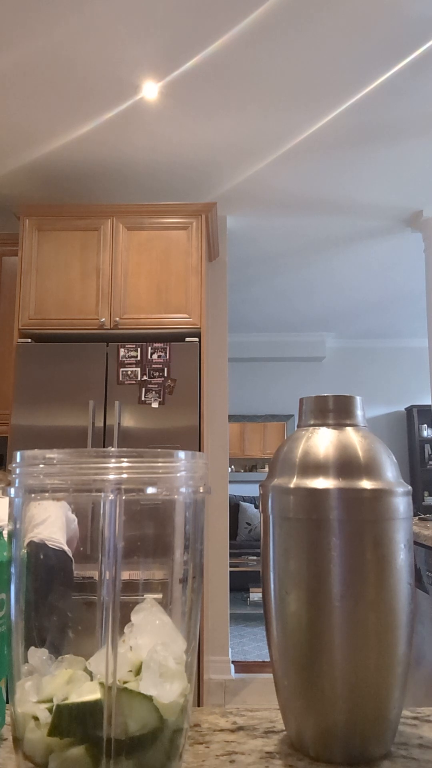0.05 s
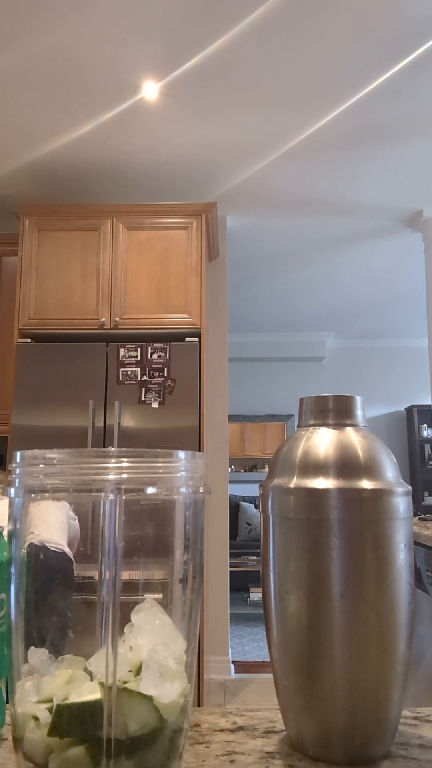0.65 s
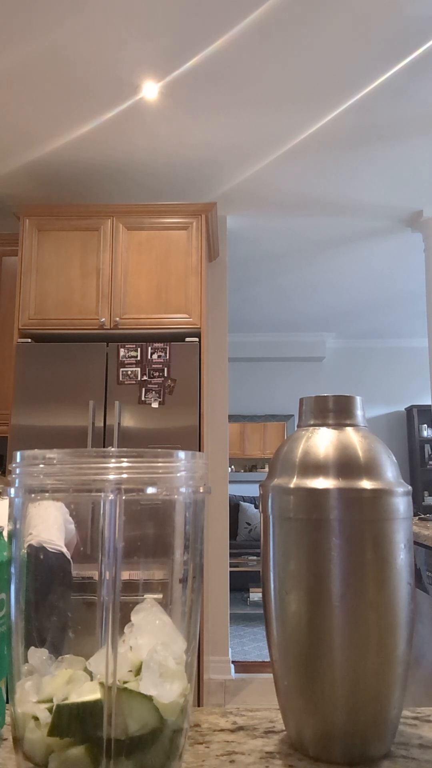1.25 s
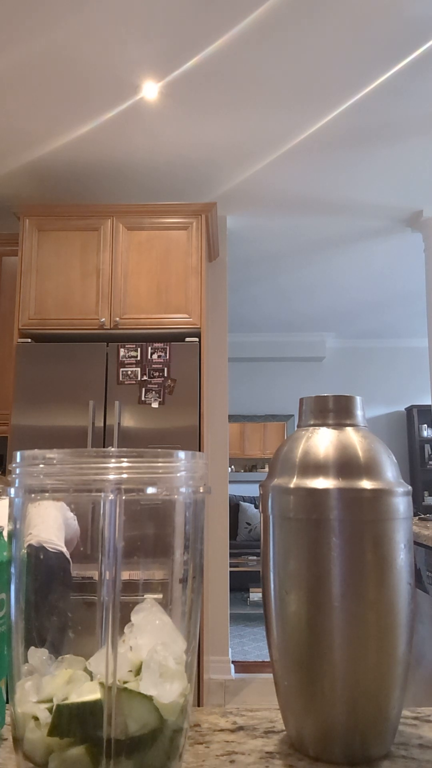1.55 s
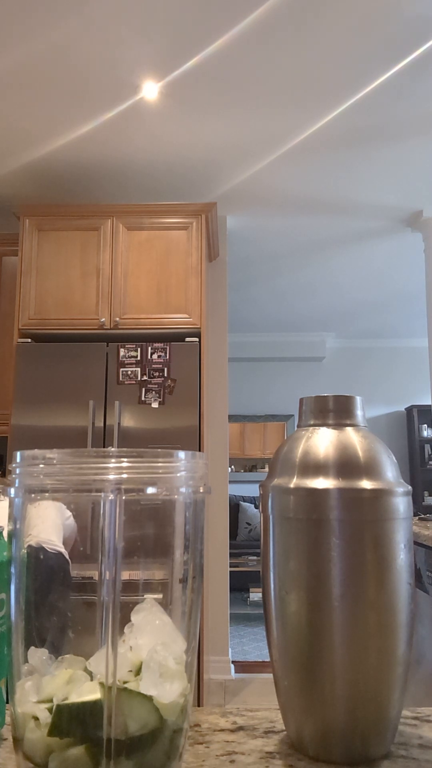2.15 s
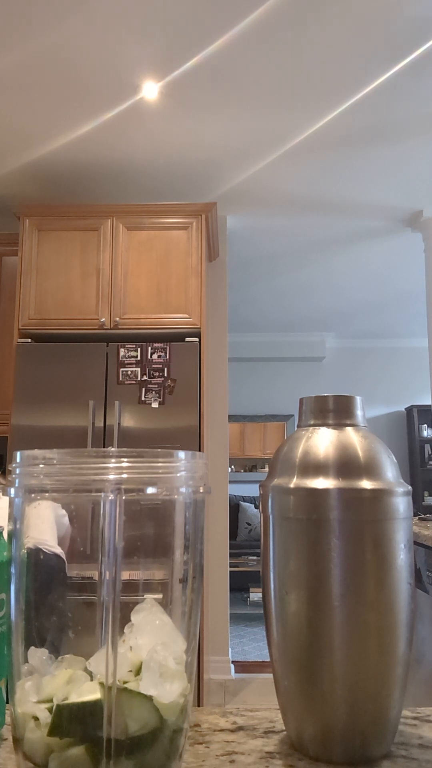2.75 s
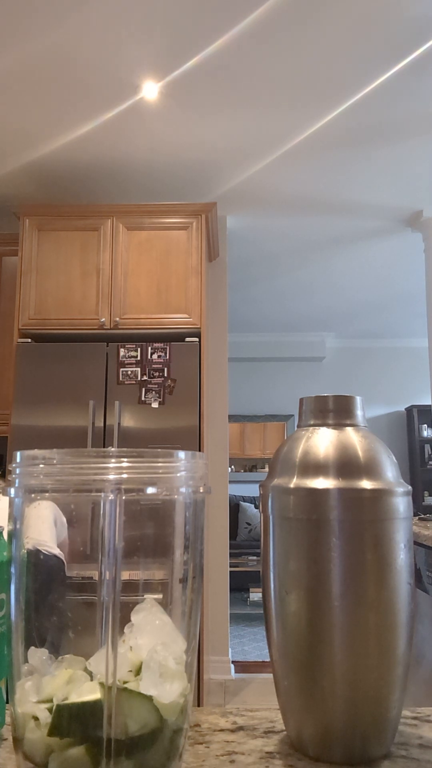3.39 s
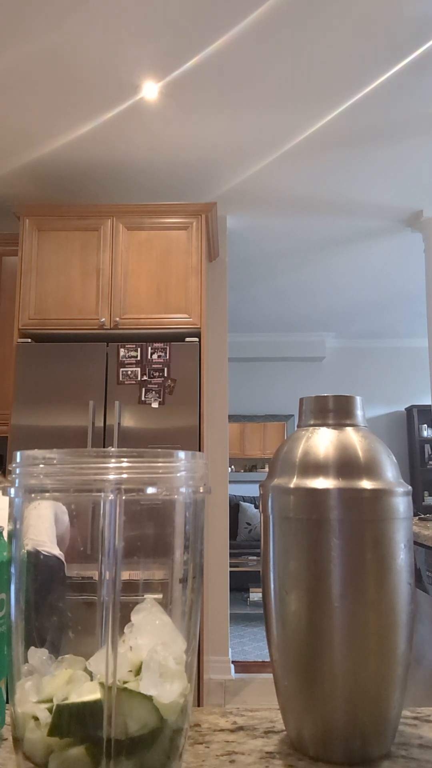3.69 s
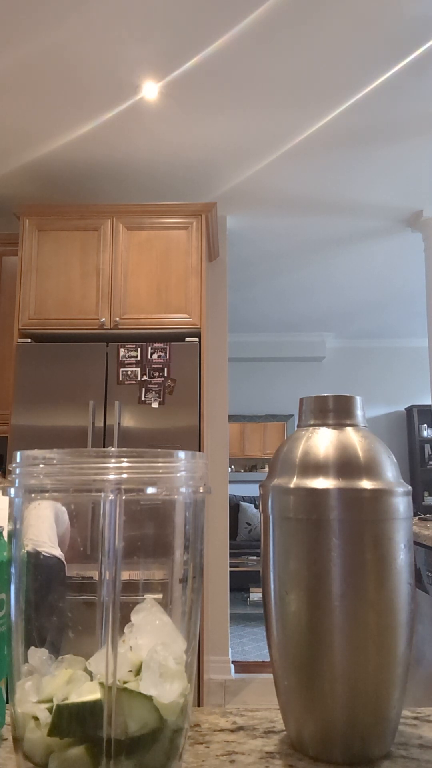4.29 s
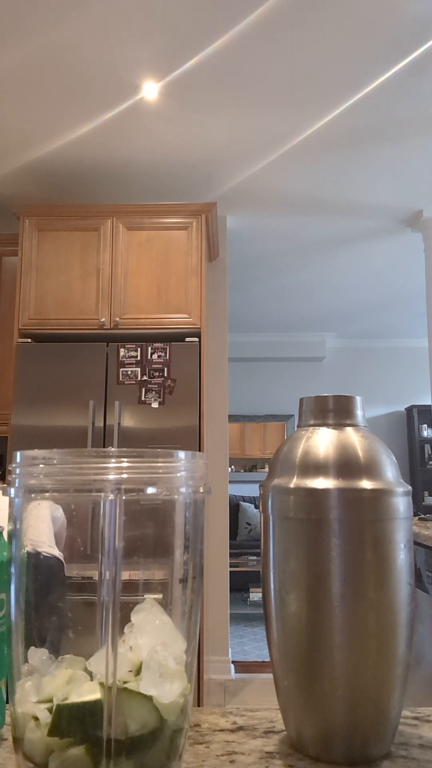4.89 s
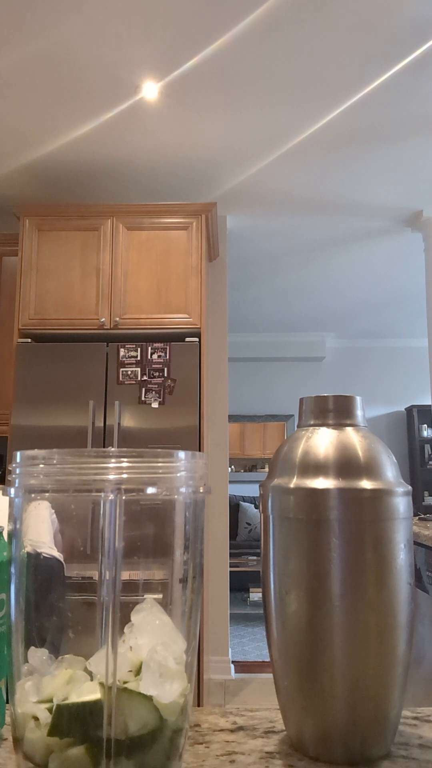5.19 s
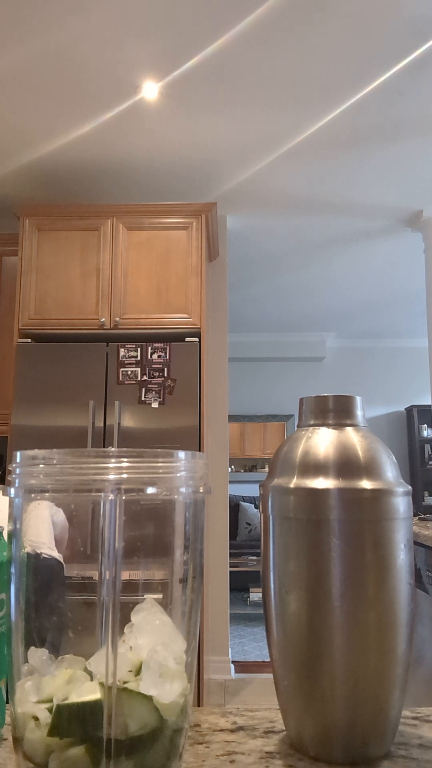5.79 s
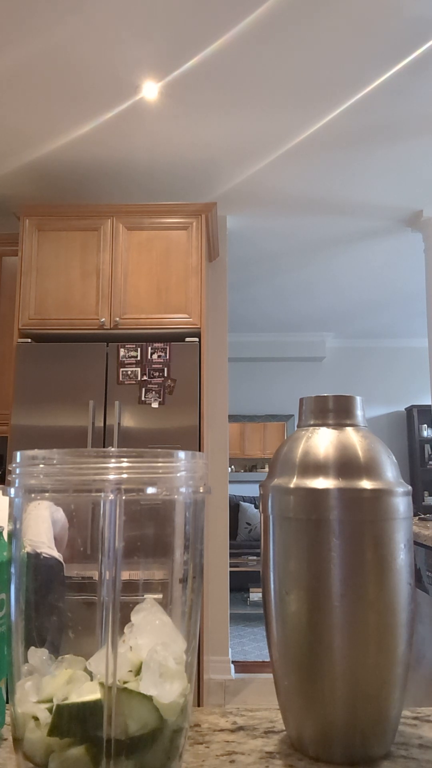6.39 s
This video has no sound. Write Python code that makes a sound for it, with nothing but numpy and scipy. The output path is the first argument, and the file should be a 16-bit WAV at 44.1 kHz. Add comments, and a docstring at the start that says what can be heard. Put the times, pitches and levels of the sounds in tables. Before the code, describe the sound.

Ice cubes are scooped from a plastic freezer bin a few metres away in a home kitchen. They clack and clink in quick, uneven clusters, with small chips ticking in between. One hard plastic knock comes early, then the digging grows louder and heavier shoves make the hollow bin boom. The microphone picks up plenty of room echo and a faint, steady fridge hum.

```python
"""Scooping ice from a freezer bin

Ice cubes are scooped out of a plastic bin, a few metres away across a kitchen. Each collision is a quick
chatter of contacts on ice and bin wall, with a short, high ring. Heavier shoves boom in the hollow bin,
and small chips shift in between. Most of this arrives as room echo, over the hum of the fridge."""
import sys
import numpy as np
from scipy import signal
from scipy.fft import rfft, irfft, next_fast_len
from scipy.io import wavfile

SR = 44100
rng = np.random.default_rng(int(sys.argv[2]) if len(sys.argv) > 2 else 0)


def master_out(mix):
    """Clip the mix to full scale and print it as 16-bit PCM to the path in sys.argv[1]."""
    frames = np.transpose(np.atleast_2d(mix))
    ceiling = np.clip(frames, -1, 1)
    pcm = np.round(ceiling * 32767).astype(np.int16)
    wavfile.write(sys.argv[1], SR, pcm)


N = 284445
TIME = np.arange(N) / SR
HIT_SIZE = 4096  # samples in one hit
HIT_HZ = np.arange(HIT_SIZE // 2 + 1) * SR / HIT_SIZE
SPOTS = 5  # places in the heap of ice, each with its own echoes

# The main collisions. Each row: start in seconds, strength in dB, hardness in dB
# (above 0 ice cracks on ice, below 0 it lands on plastic).
CLACKS = [(0.027, -37.5, -5.5), (0.103, -41, 8), (0.11, -35, 8), (0.218, -35.5, -1), (0.379, -56, 8.5),
          (0.453, -49.5, 12.5), (0.512, -38.5, 3), (0.53, -36.5, -6), (0.578, -45.5, 8), (0.615, -36.5, 5),
          (0.843, -45.5, 5.5), (0.896, -38, 5), (0.903, -33, 5.5), (0.926, -33, 11), (1.019, -39, 4),
          (1.22, -43.5, 1), (1.258, -35, 6), (1.297, -32.5, 5), (1.418, -45.5, 16.5), (1.43, -36.5, -5.5),
          (1.502, -31.5, -4), (1.669, -40, -4), (1.817, -44, 7.5), (1.84, -42.5, 5), (1.932, -48, -8),
          (2.154, -38.5, 1), (2.18, -43, -1), (2.305, -47, 6), (2.332, -45.5, 4), (2.376, -43.5, 2),
          (2.411, -43, 3), (2.462, -37, 1), (2.785, -39, 2.5), (2.811, -37, -0.5), (2.831, -40.5, 9),
          (3.052, -33.5, 1), (3.369, -42, -7), (3.461, -43.5, -5), (3.581, -35, 0), (3.624, -35.5, 5.5),
          (3.654, -29, 4.5), (3.683, -28.5, 8), (4.065, -38.5, -2), (4.086, -28.5, 2.5),
          (4.098, -28.5, 2.5), (4.142, -33.5, 5), (4.176, -37.5, 2), (4.194, -31, 6.5), (4.206, -34.5, -1),
          (4.295, -45.5, -23), (4.448, -54, 4.5), (4.589, -40.5, 1), (4.635, -42.5, 7.5),
          (4.678, -42, 10.5), (4.709, -35.5, 5), (4.733, -28.5, -1), (4.753, -30.5, 1), (4.954, -39.5, -4),
          (5.115, -43, -6), (5.295, -45.5, 4.5), (5.34, -38.5, -3), (5.357, -37, -9), (5.592, -41, 1),
          (5.613, -34.5, 2), (5.716, -24.5, 2), (5.742, -28.5, -1), (5.762, -32.5, -5), (5.832, -39.5, 3),
          (5.997, -41.5, -10), (6.092, -39, 3), (6.11, -34.5, 1), (6.196, -39, 9), (6.221, -29, 0.5),
          (6.294, -36.5, -1)]
# The notes the bin wall rings at. Each row: pitch in Hz, width in Hz, level in dB.
WALL_NOTES = [(528, 264, 10), (824, 320, -5), (1106, 116, 3.5), (1570, 130, -0.5), (1754, 64, -3.5)]
# The tone of whole cubes, of their corners and of breaking frost. Each row: frequency in Hz, level in dB.
CUBE_TONE = [(1000, -39), (1800, 10.5), (2400, 7), (3300, 4.5), (4200, -27.5), (6000, -36)]
CORNER_TONE = [(2200, -50), (3500, -3.5), (4400, 3.5), (5100, 5), (6500, 1.5), (7600, -7.5), (11000, -41)]
FROST_TONE = [(3500, -73.5), (6000, 7.5), (7200, 5.5), (8400, 5), (10000, 3), (12000, -3), (16000, -0.5)]


def gain(db):
    """Turn decibels into a number to multiply by."""
    return 10 ** (np.asarray(db) / 20)


def unit(x):
    """Scale a sound to an energy of one."""
    return x / np.sqrt(np.sum(x ** 2) + 1e-18)


def look_up(points, hz, column=1):
    """Read between the rows of a frequency table, giving each octave equal room."""
    points = np.array(points, float)
    return np.interp(np.log(np.maximum(hz, 1)), np.log(points[:, 0]), points[:, column])


def tone_filter(points, column=1):
    """Turn rows of Hz and dB into a filter that rings only after it is struck."""
    cepstrum = irfft(np.log(gain(look_up(points, HIT_HZ, column))))
    cepstrum[1:HIT_SIZE // 2] *= 2
    cepstrum[HIT_SIZE // 2 + 1:] = 0
    return np.exp(rfft(cepstrum))


def resonance(hz, width_hz):
    """The spectrum of one ringing note: the wider it is, the sooner it dies away."""
    return 1j * HIT_HZ * width_hz / (hz ** 2 - HIT_HZ ** 2 + 1j * HIT_HZ * width_hz)


def add_hit(track, start_s, spectrum, db):
    """Mix in one hit with as much energy as 20 ms of steady sound at this level."""
    hit = unit(irfft(spectrum)) * gain(db) * np.sqrt(.02 * SR)
    start = max(int(start_s * SR), 0)
    part = hit[:, :max(N - start, 0)]
    track[:, start:start + part.shape[1]] += part


def chatter(gap_s, rebound, count):
    """A first contact and its fading, uneven rebounds, spread over the heap: one spectrum per spot."""
    delays = np.r_[0, np.cumsum(rng.exponential(gap_s, count))]
    sizes = np.r_[1, rebound * rng.choice([-1, 1], count) * np.linspace(1, .3, count)]
    contacts = np.zeros((SPOTS, HIT_SIZE))
    spots = (rng.integers(SPOTS) + np.arange(count + 1)) % SPOTS
    contacts[spots, (delays * SR).astype(int) % HIT_SIZE] = sizes
    return rfft(contacts)


def patter(per_s, spread_db, body, curve):
    """Tiny random contacts ring a body; their level follows rows of seconds and dB."""
    count = int(per_s * N / SR)
    chance, ticks = rng.standard_normal(count), np.zeros((SPOTS, N))
    sizes = np.sign(chance) * gain(spread_db * np.minimum(abs(chance), 2))
    ticks[rng.integers(SPOTS, size=count), rng.integers(N, size=count)] = sizes
    sound = signal.oaconvolve(ticks, irfft(body)[None], axes=1)[:, :N]
    return unit(sound) * np.sqrt(N) * gain(np.interp(TIME, *np.transpose(curve)))


def surrounding_noise(size, apart_hz=520):
    """The spectrum of stereo noise from all round: long waves reach both microphones alike."""
    hz = np.arange(size // 2 + 1) * SR / size
    mid, side = rfft(rng.standard_normal((2, size)))
    share = np.minimum(hz / apart_hz, 1) ** 17
    return hz, (mid + np.array([[1], [-1]]) * share * side) / np.sqrt(1 + share ** 2)


def fridge_hum(waver_db=5.5):
    """The compressor hums on a few low notes, each wavering by itself."""
    # The notes of the hum. Each row: pitch in Hz, usual level in dB.
    notes = [(59.3, -54.5), (92.8, -61), (118.6, -67.5), (199, -83)]
    # The slow swell of the whole hum. Each row: time in seconds, change in dB.
    swell = [(0, 0.5), (.5, -3.5), (1.4, 2.5), (2.6, -0.5), (3.3, -4.5), (4.4, -2), (5.3, 1.5), (6.0, 3),
             (6.45, 2)]
    turns_s = np.linspace(0, N / SR, 40)
    hum = 0
    for hz, db in notes:
        waver = np.interp(TIME, turns_s, rng.standard_normal(len(turns_s)))
        phase = 2 * np.pi * (hz * TIME + rng.random()) + 0.065 * waver
        hum += np.sqrt(2) * gain(db + waver_db * waver) * np.sin(phase)
    return hum * gain(np.interp(TIME, *np.transpose(swell)))


def room_air(level_db=-55.5):
    """Soft, dark room noise."""
    # The tone of the quiet kitchen. Each row: frequency in Hz, relative level in dB.
    air_tone = [(20, 1), (45, 11.5), (60, 7), (80, 12), (130, 12), (220, 10.5), (400, -13), (1000, -32),
                (3000, -12), (8000, -28), (16000, -37)]
    hz, noise = surrounding_noise(2 * next_fast_len(N // 2 + 1))
    air = irfft(noise * gain(look_up(air_tone, hz)))[:, :N]
    return unit(air) * np.sqrt(2 * N) * gain(level_db)


def collisions(tumbles_per_s=32, fade_db_per_s=-22.5, spread_db=6):
    """List the main collisions, then those of loose cubes tumbling ahead of the scoop."""
    # Runs of tumbling cubes. Each row: start in seconds, length in seconds, strength in dB, hardness in dB.
    tumbles = [(3.472, 0.1, -49.5, 4.5), (3.769, .22, -44.5, -8), (4.919, .12, -41, -0.5),
               (5.16, .11, -49, -1.5), (5.41, .16, -48, 1)]
    rows = list(CLACKS)
    for start, length, db, hardness in tumbles:
        count = max(round(length * tumbles_per_s), 1)
        for delay in length * (np.arange(count) + rng.random(count)) / count:
            strength_db = db + fade_db_per_s * delay + spread_db * rng.standard_normal()
            rows.append((start + delay, strength_db, hardness))
    return rows


def stray_notes(low_hz, high_hz, count, width_hz):
    """No two corners or splinters have the same shape, so their extra notes fall at random."""
    return sum(resonance(hz, width_hz) for hz in rng.uniform(low_hz, high_hz, count))


def wall_knock(spread_db=4.4):
    """The spectrum of one knock on the wall: each note varies with the place struck and the load of ice."""
    wall = 0
    for hz, width, db in WALL_NOTES:
        strength = gain(db + spread_db * rng.standard_normal())
        wall += strength * resonance(hz * rng.uniform(0.873, 1.03), width)
    return wall * resonance(1090, 2400)


def ice_clacks(unshifted_hz=2173, usual_corner_hz=4923, pitch_spread=0.025):
    """Each collision knocks the wall, clacks with a short ring, clicks a corner and breaks some frost."""
    # A ring near 2.5 kHz on each clack, slightly lower and more damped in the second half.
    # Each row: time in seconds, pitch in Hz, how freely it rings (more is freer).
    clack_ring = [(0, 2495, 0.84), (1.3, 2480, 1.26), (3.102, 2520, 0.55), (3.5, 2400, 0.17),
                  (4.7, 2325, 0.59), (5.4, 2280, 0.19), (6.45, 2344, 0.85)]
    times, pitches, freedoms = np.transpose(clack_ring)
    corner_filter, frost_filter = tone_filter(CORNER_TONE), tone_filter(FROST_TONE)
    out = np.zeros((SPOTS, N))
    for start, db, hardness in collisions():
        ring_hz = np.interp(start, times, pitches) * np.exp(pitch_spread * rng.standard_normal())
        corner_hz = usual_corner_hz * np.exp(pitch_spread * rng.standard_normal())
        freedom = np.interp(start, times, freedoms)
        contact = chatter(gap_s=.0016, rebound=1, count=6)
        tone_shift = (ring_hz / unshifted_hz) ** 0.27  # the clack's whole tone rises a little with its ring
        clack = tone_filter([(hz * tone_shift, level) for hz, level in CUBE_TONE])
        clack *= 1 + 2.3 * freedom * resonance(ring_hz, 70)
        free_ring_db = freedom - 1  # a clack that rings freely is slightly louder
        strays = stray_notes(3000, 7000, count=3, width_hz=130)
        corner = corner_filter * (1 + 1.5 * resonance(corner_hz, 100) + 0.99 * strays)
        frost = frost_filter * (1 + 1.1 * stray_notes(7000, 15000, count=5, width_hz=160))
        # soft contacts favour the wall, hard ones the corners and frost
        add_hit(out, start, contact * wall_knock(), db - 0.33 * hardness)
        add_hit(out, start, contact * clack, db - 0.16 - 0.14 * hardness + free_ring_db)
        add_hit(out, start, contact * corner, db - 4.25 + 0.43 * hardness)
        add_hit(out, start, contact * frost, db - 6.5 + 0.97 * hardness)
    return out


def ice_chips(quieter_db=12.5, settle_s=0.04):
    """Each main collision loosens small chips that tick as they come to rest."""
    t = np.linspace(0, N / SR, 600)
    power = sum(gain(db - quieter_db) ** 2 * (t > start) * np.exp(-abs(t - start) / settle_s)
                for start, db, _ in CLACKS)
    settling = np.c_[t, 10 * np.log10(power + 1e-12)]
    ice = tone_filter(CUBE_TONE) + 1.63 * tone_filter(CORNER_TONE) + 0.72 * tone_filter(FROST_TONE)
    wall = sum(gain(db) * resonance(hz, width) for hz, width, db in WALL_NOTES)
    body = (ice + 1.24 * wall) * resonance(2600, 12000)
    return patter(per_s=110, spread_db=8, body=body, curve=settling)


def bin_booms(hollow_hz=217, usual_floor_hz=420.4, pitch_spread=0.042, nudge_db=-48.5):
    """The heap thumps the bin, which hums briefly at two notes: one from its hollow, one from its floor."""
    # Heavy shoves. Each row: start in seconds, strength in dB, pitch of the loaded bin floor in Hz.
    shoves = [(0.032, -46, 556), (0.226, -36.5, 500), (0.52, -55, 527), (0.645, -38, 400),
              (0.707, -38, 438), (0.922, -37, 433), (1.02, -43.5, 517), (1.505, -31, 568), (1.69, -40, 423),
              (1.931, -35, 406), (2.018, -63, 405), (2.163, -51, 408), (2.405, -52, 336), (2.646, -54, 416),
              (2.8, -49.5, 420), (2.831, -36, 408), (3.054, -55, 430), (3.667, -39, 404), (3.381, -47, 515),
              (4.088, -29.5, 436), (4.108, -23, 425), (4.295, -27, 422), (4.635, -40, 430),
              (4.751, -27, 394), (4.94, -42, 496), (5.42, -34.5, 417), (5.498, -39, 400),
              (5.616, -35.5, 410), (5.67, -35.5, 411), (5.72, -37.5, 403), (5.764, -38, 503),
              (6.002, -47.5, 544), (6.221, -37, 563)]
    average_shove_db = np.mean([db for _, db, _ in shoves])
    average_clack_db = np.mean([db for _, db, _ in CLACKS])
    thumps = list(shoves)
    for start, db, _ in CLACKS:  # each main collision also nudges the bin
        floor_hz = usual_floor_hz * np.exp(pitch_spread * rng.standard_normal())
        thumps.append((start, nudge_db + db - average_clack_db, floor_hz))
    out = np.zeros((SPOTS, N))
    for start, db, floor_hz in thumps:
        # a lighter load raises the floor note and lets the hollow sound more
        unload_db = 8 * np.log2(floor_hz / usual_floor_hz)
        dig_db = -0.88 * start  # as the scoop digs deeper, less of a shove reaches the hollow
        hollow_db = -40.5 + 0.95 * (db - average_shove_db) + unload_db + dig_db
        push = chatter(gap_s=0.006385, rebound=0.64, count=2)
        for hz, width, note_db in (hollow_hz, 21, hollow_db), (floor_hz, 29, db + 1.76):
            soft_start = resonance(hz, hz * 0.34)  # the heap leans in softly, so the note swells
            add_hit(out, start, push * resonance(hz, width) * soft_start, note_db)
    return out


def bin_rap():
    """The bin knocks once against its frame: a hard blow that rings the plastic briefly."""
    # The blow. Its row: start in seconds, strength in dB.
    blows = [(1.506, -20)]
    # The notes it rings. Each row: pitch in Hz, width in Hz, relative level in dB.
    notes = [(505, 280, 15), (640, 200, 16), (760, 64, 3), (1110, 39, 14), (1452, 58, 17), (1590, 37, 8),
             (2440, 420, -2)]
    ring = sum(gain(db) * resonance(hz, width) for hz, width, db in notes)
    crack = 0.13 * resonance(3400, 3000)
    body = (ring + crack) * resonance(890, 1900)
    out = np.zeros((SPOTS, N))
    for start, db in blows:
        add_hit(out, start, chatter(gap_s=0.00136, rebound=0.46, count=2) * body, db)
    return out


def drawer_bumps():
    """The drawer gives a few soft, deep bumps."""
    # Each row: middle of the bump in seconds, level in dB, pitch in Hz, time to fade in seconds.
    bumps = [(1.77, -41, 49.5, .035), (2.662, -36, 129, 0.0057), (3.288, -55, 106, 0.02)]
    out = 0
    for middle, db, hz, fade_s in bumps:
        t = TIME - middle
        out += gain(db) * np.exp(-(t / fade_s) ** 2) * np.sin(2 * np.pi * hz * t)
    return out


def cube_rub(pitch_hz=1115, boost_db=3):
    """One cube sticks and slips along the bin wall."""
    # The rise and fall of the rub. Each row: time in seconds, level in dB before the boost.
    swell = [(4.91, -76), (4.98, -48), (5.06, -53), (5.14, -48.5), (5.21, -57), (5.3, -75)]
    body = resonance(pitch_hz, 50) * resonance(pitch_hz, 300)
    return gain(boost_db) * patter(per_s=500, spread_db=2, body=body, curve=swell)


def kitchen(spots, direct_db, door_db, early_db, early_s, build_s):
    """Sound arrives directly, off the freezer door and as a wash of echoes, different for each spot."""
    # How long the room rings. Each row: frequency in Hz, seconds to fade by 60 dB.
    ring_times = [(150, 0.28), (400, 0.86), (1000, 0.81), (2800, 0.48), (7000, 0.42), (15000, 0.4)]
    size, left_lag = 24576, 18  # in samples; both paths reach the right microphone first
    t, hz = np.arange(size) / SR, np.arange(size // 2 + 1) * SR / size
    octaves_hz = 125 * 2 ** np.arange(8)
    bands = [np.interp(np.log(hz + 1), np.log(octaves_hz), pick) for pick in np.eye(8)]
    early = gain(early_db) * np.exp(-t / early_s)
    build = np.minimum(t / build_s, 1)
    fades = [unit((1000 ** (-t / ring_s) + early) * build) for ring_s in look_up(ring_times, octaves_hz)]
    out = 0
    for spot in spots:
        _, noise = surrounding_noise(size)
        echoes = unit(sum(irfft(noise * band) * fade for band, fade in zip(bands, fades))) * np.sqrt(2)
        door_s = .0065 + .002 * rng.random()
        for delay, db in (0, direct_db), (int(SR * door_s), door_db):
            echoes[[0, 1], [delay + left_lag, delay]] += gain(db)
        out += signal.oaconvolve(spot[None], unit(echoes) * np.sqrt(2), axes=1)[:, :N]
    return out


def scene():
    """Ice and bin sound through the kitchen; the bin faces the room, so its booms and rap are more direct."""
    heap = ice_clacks() + ice_chips() + cube_rub()
    ice = kitchen(heap, direct_db=-16, door_db=-9, early_db=2, early_s=.015, build_s=.008)
    booms = kitchen(bin_booms(), direct_db=-6.5, door_db=-76, early_db=17.5, early_s=.035, build_s=.0094)
    rap = kitchen(bin_rap(), direct_db=-6.5, door_db=-3.5, early_db=7, early_s=.011, build_s=.0025)
    return ice + booms + rap + fridge_hum() + drawer_bumps() + room_air()


def record(dry, top_hz=15800):
    """Two microphones hear the bass alike; above it the left is fuller and the right brighter."""
    # The tone of the microphones. Each row: frequency in Hz, left level in dB, right level in dB.
    mic_tone = [(292, -2, -0.5), (570, 0, -9.5), (1080, 2, -3.5), (2070, 6, 1.5), (3390, -1.5, -4),
                (4170, 4, 5.5), (3900, -20, -24), (4270, 3, -3), (5550, 6, -2.5), (5800, -5.5, -2),
                (7500, -8, -4.5), (8120, -1.5, 2), (9670, -2.5, -3), (11600, -3.5, 7.5), (15500, -9, 0)]
    with_bass = [(110, 0, 0)] + list(mic_tone)
    mics = [irfft(tone_filter(with_bass, column)) for column in (1, 2)]
    heard = np.array([signal.fftconvolve(side, mic)[:N] for side, mic in zip(dry, mics)])
    steep_treble_cut = signal.ellip(10, .2, 70, top_hz, fs=SR, output="sos")
    return signal.sosfilt(steep_treble_cut, heard)


dry = scene()
out = record(dry)
master_out(out)
```